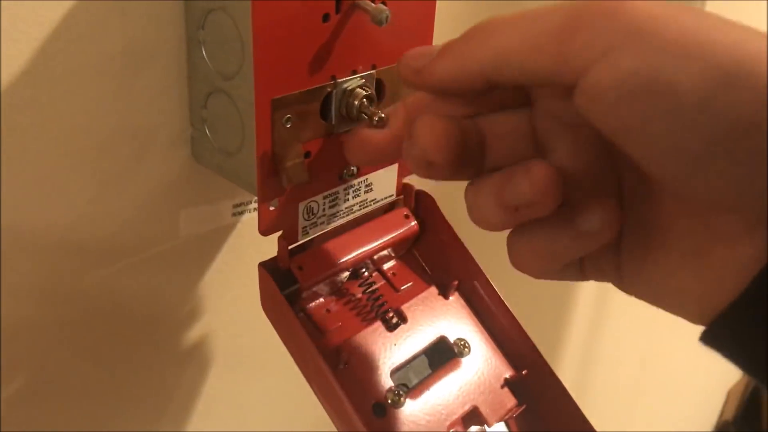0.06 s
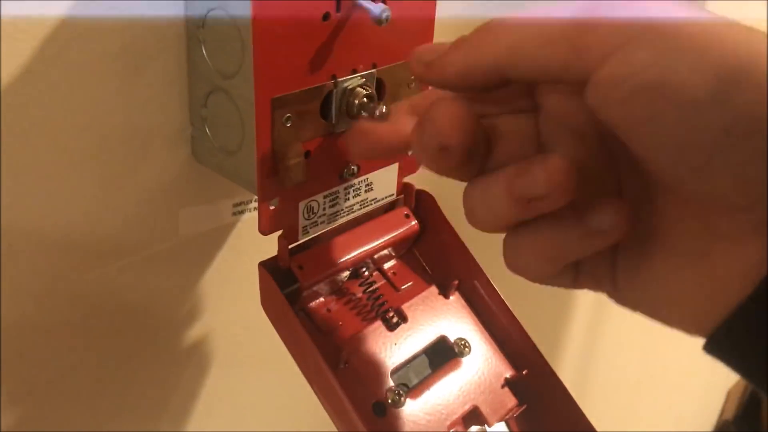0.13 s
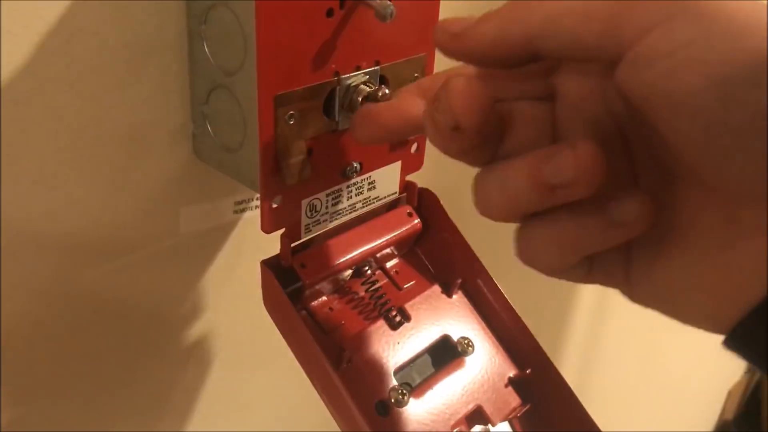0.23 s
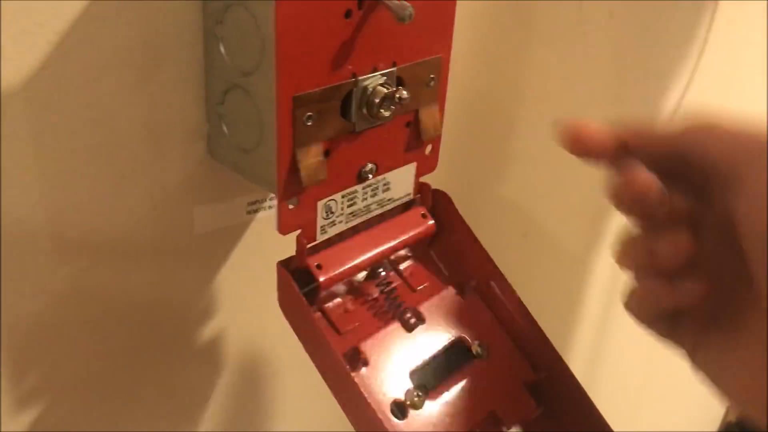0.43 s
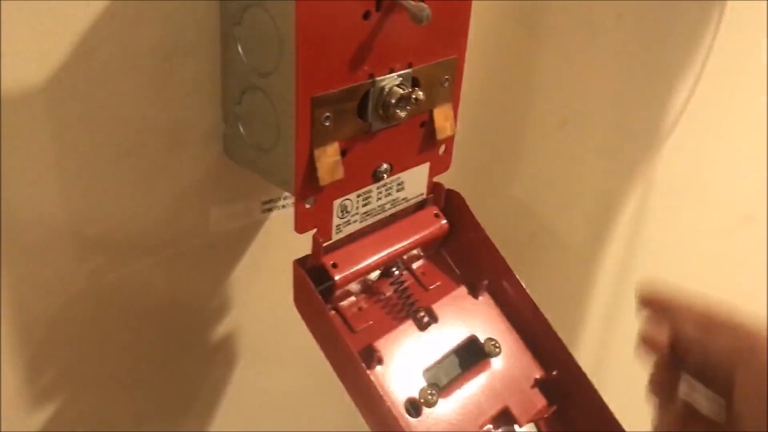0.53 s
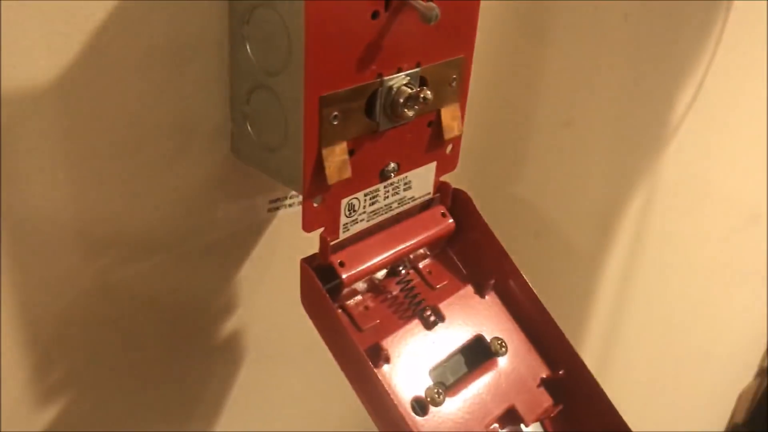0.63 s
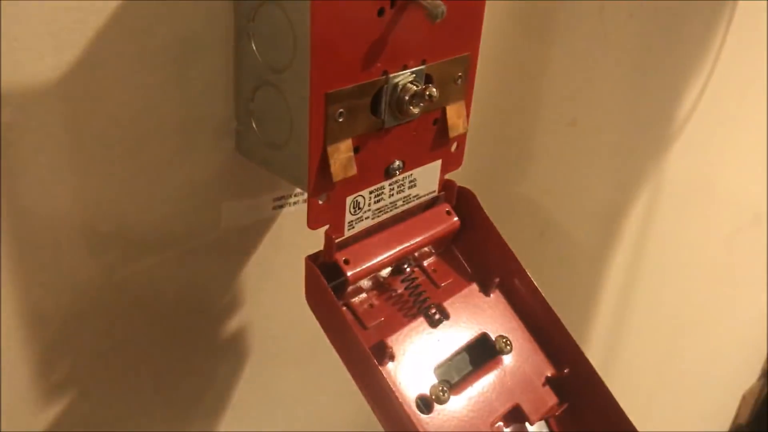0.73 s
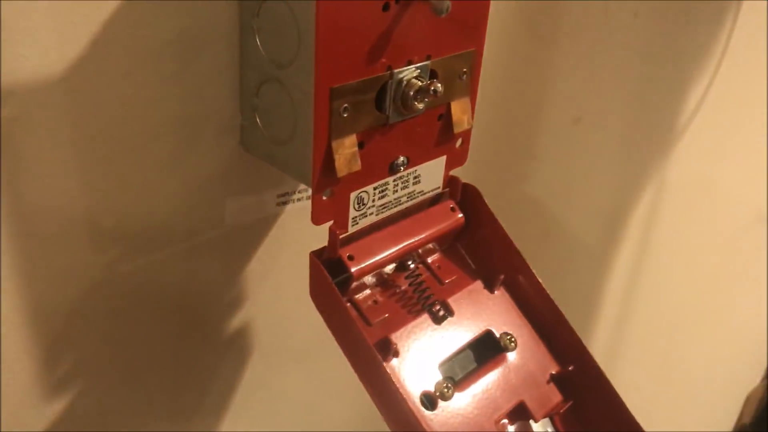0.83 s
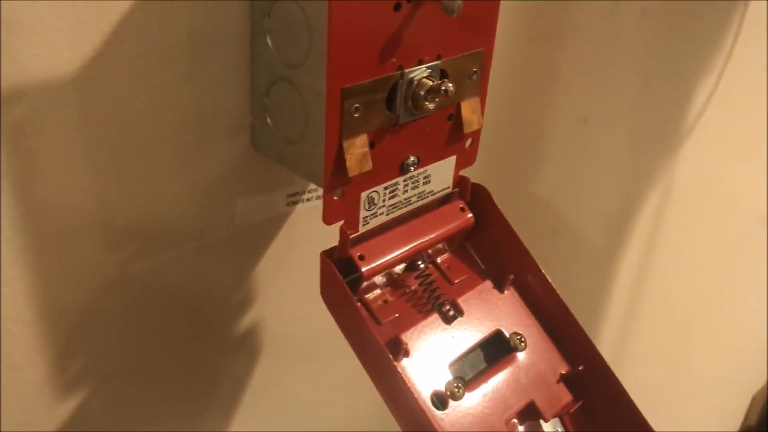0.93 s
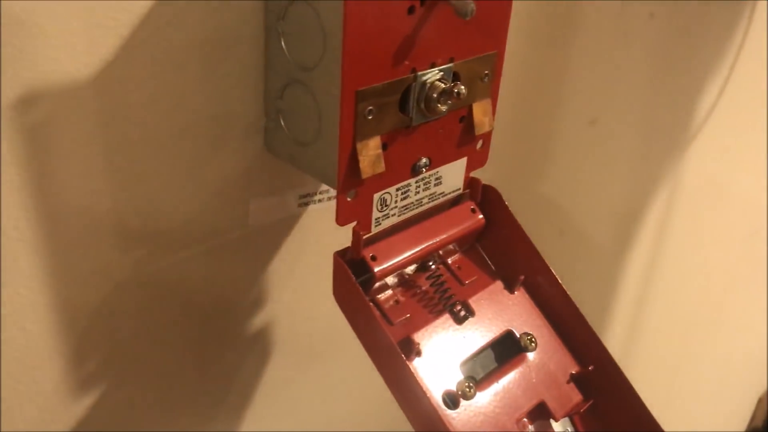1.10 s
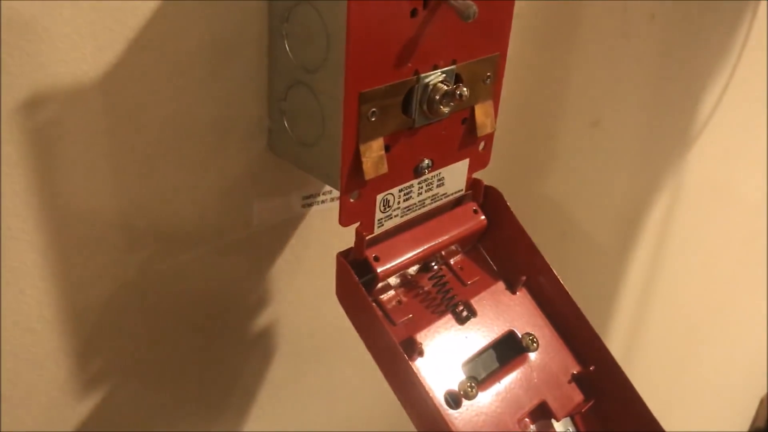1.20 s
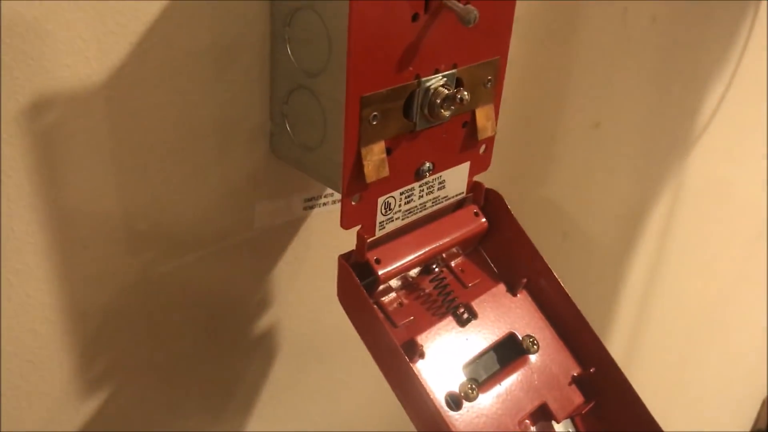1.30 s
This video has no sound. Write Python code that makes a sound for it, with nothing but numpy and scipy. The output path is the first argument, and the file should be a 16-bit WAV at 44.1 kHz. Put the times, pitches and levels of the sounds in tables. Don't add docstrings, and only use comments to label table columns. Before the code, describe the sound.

A small toggle switch snaps over with one sharp metallic click in a wall-mounted metal box.

```python
import sys
import numpy as np
from scipy import signal
from scipy.fft import rfft, irfft, next_fast_len
from scipy.io import wavfile
from scipy.ndimage import map_coordinates

SR = 44100
rng = np.random.default_rng(int(sys.argv[2]) if len(sys.argv) > 2 else 0)


def amplitude_ratio(level_db):
    exponent = np.asarray(level_db, float) / 20
    return 10 ** exponent


def generate_wav(sig):
    pcm = np.round(np.clip(np.atleast_2d(sig).T, -1, 1) * 32767).astype(np.int16)
    wavfile.write(sys.argv[1], SR, pcm)


N = 59535

# t/s, level/dB, brightest f/Hz
CONTACTS = [
    (.2496, -27.5, 6000),
    (.2502, -15.5, 6500),
    (0.2503, -30, 5000),
    (.2524, -22, 11000),
    (0.2526, -26.5, 5000),
    (.2551, -28.5, 4000),
]
SNAP_S = CONTACTS[1][0]
# f/Hz, width/Hz, level/dB
WALL_RUMBLE = [(146, 23, -0.5), (193, 35, -1), (273, 53, -4)]


def unit(x):
    return x / np.sqrt(np.mean(x ** 2) + 1e-20)


def along(points, hz):
    f, v = np.transpose(points)
    return np.interp(np.log(hz + 1), np.log(f + 1), v)


def filtered(x, response):
    m = next_fast_len(len(x) + SR // 2)
    hz = np.fft.rfftfreq(m, 1 / SR)
    return irfft(rfft(x, m) * response(hz), m)[:len(x)]


def resonant(x, peaks):
    def response(f):
        total = 0
        for k, (center, width, db) in enumerate(peaks):
            damping = 1j * f * width
            total = total + (-1) ** k * amplitude_ratio(db) * damping / (center ** 2 - f ** 2 + damping)
        return total
    return filtered(x, response)


def ring(modes, t, rise_s, turn):
    total = np.zeros(len(t))
    for k, (hz, db, t60) in enumerate(modes):
        total += turn ** k * amplitude_ratio(db - 60 * t / t60) * np.sin(2 * np.pi * hz * t)
    return (1 - np.exp(-t / rise_s)) * total


def add(track, s, sound):
    part = track[round(s * SR):][:len(sound)]
    part += sound[:len(part)]


def floor():
    # f/Hz, level/dB per Hz
    hiss_color = [(12, -32), (20, 4), (558, -12.5), (923, -15.5), (1000, -15), (1090, -14.5), (2460, -18.5),
                  (2670, -19), (16000, -18.5)]
    # f/Hz, level/dB rms
    hum_partials = [(118.4, -77), (242.2, -87.5), (301.5, -87), (479.1, -87.5), (538.3, -85.5),
                    (597.5, -90.5), (662.1, -88), (721.4, -90)]
    hiss_db = -68
    t = np.arange(N) / SR

    def sway():
        return map_coordinates(rng.standard_normal(20), [t * 9])

    hum = np.zeros(N)
    for hz, db in hum_partials:
        level = amplitude_ratio(db + 2.5 + 1.9 * sway())
        hum += level * np.sin(2 * np.pi * hz * t + sway())
    hiss = unit(filtered(rng.standard_normal(N), lambda f: amplitude_ratio(along(hiss_color, f))))
    return hum + amplitude_ratio(hiss_db) * hiss


def clock():
    # f/Hz, width/Hz, level/dB
    case = [(1500, 1800, -10.5), (4000, 2000, -10.5), (7260, 500, 5), (9570, 2500, -3), (13500, 5800, -4.5)]
    clock_db, rattle_s, knock_s = -54.5, 0.0036, 0.0105
    kicks, t = np.zeros(N), np.arange(SR // 20) / SR
    shape = amplitude_ratio(-60 * np.clip(t - rattle_s, 0, 1) / 0.008)
    shape = shape + 0.14 * (t > knock_s) * amplitude_ratio(-60 * abs(t - knock_s) / 0.005)
    for s in (0.26, 1.2262):
        add(kicks, s, shape * rng.standard_normal(len(t)))
    return amplitude_ratio(clock_db) * 2 * resonant(kicks, case)


def grip():
    # t/s, level/dB
    pressure = [(0, -82), (0.451, -75), (.5, -68), (0.533, -69), (.546, -81), (0.611, -65), (.66, -78.5),
                (0.758, -82.5), (0.801, -66), (.85, -71.5), (.88, -90), (0.971, -64.5), (1.04, -69.5),
                (1.09, -101), (1.16, -71.5), (1.21, -77.5), (1.312, -77.5), (1.35, -68.5)]
    # f/Hz, width/Hz, level/dB
    shell = [(5333, 260, 0.5), (6690, 350, -3.5), (10800, 2500, -4), (12800, 1500, -2.5)]
    # t/s, peak level/dB
    creak_times = [(0.4938, -45), (0.5043, -40), (0.5145, -42), (0.5214, -42), (0.5327, -38), (0.8254, -53),
                   (0.8627, -57), (0.8884, -58), (0.9334, -64), (0.9637, -59), (0.9862, -58.5),
                   (1.013, -56), (1.0423, -54), (1.064, -41), (1.1445, -43), (1.1583, -43), (1.1785, -39)]
    creak_db, slips_per_s, slip_spread_db, rub_share = 6.5, 1500, 4, 0.29

    chance, size, side = rng.random((3, N))
    slips = (chance < slips_per_s / SR) * amplitude_ratio(-slip_spread_db * np.log(size + 0.1)) * np.sign(side - 0.5)
    friction = rub_share * rng.standard_normal(N) + (1 - rub_share) * unit(slips)
    rub = unit(resonant(friction, shell))

    creaks = np.zeros(N)
    slip_burst = np.array([1, 0.2, 0, 0, 0.1, 0, 0, 0.2, 1.0])
    for s, peak_db in creak_times:
        add(creaks, s, amplitude_ratio(peak_db + creak_db) * slip_burst)

    s, db = np.transpose(pressure)
    return amplitude_ratio(np.interp(np.arange(N) / SR, s, db)) * rub + resonant(creaks, shell)


def wall_rumble():
    return unit(resonant(resonant(rng.standard_normal(N), WALL_RUMBLE), WALL_RUMBLE))


def lean():
    lean_s, span_s, lean_db = 0.135, 0.042, -69
    swell = np.exp(-((np.arange(N) / SR - lean_s) / span_s) ** 2)
    return amplitude_ratio(lean_db) * swell * wall_rumble()


def box_reverb():
    # f/Hz, width/Hz, level/dB
    box_colour = [(2490, 730, 1), (5000, 3900, 0.5), (7100, 1900, -5), (10200, 4000, -3.5)]
    reverb_db, reverb_t60 = -29.5, 0.064
    thud_db, thud_t60, thud_rise_s = -49, 0.35, 0.011
    t = np.clip(np.arange(N) / SR - SNAP_S, 0, 9)
    reverb = amplitude_ratio(reverb_db - 60 * t / reverb_t60) * unit(resonant(rng.standard_normal(N), box_colour))
    thud = amplitude_ratio(thud_db - 60 * t / thud_t60) * wall_rumble()
    return (t > 0) * reverb + (1 - np.exp(-t / thud_rise_s)) * thud


def room(x):
    # f/Hz, t60/s
    decay = [(300, 1), (1000, 0.38), (3000, 0.33), (7000, 0.31), (14000, 0.17)]
    delay_s = 0.005
    hz, t, z = signal.stft(rng.standard_normal(SR // 2), SR, nperseg=256)
    z = z * amplitude_ratio(-60 * t / along(decay, hz)[:, None])
    tail = signal.istft(z, SR, nperseg=256)[1]
    delayed = np.pad(x, (round(delay_s * SR), 0))
    return signal.fftconvolve(delayed, tail / np.linalg.norm(tail))[:N]


def room_answer(switch):
    # f/Hz, level/dB
    air = [(200, -44.5), (400, -9.5), (900, -4), (1500, -0.5), (2700, 1), (6000, -6.5), (11000, 2),
           (16000, -9)]
    air_db, send_db = -27, -24.5
    snap = np.zeros(N)
    add(snap, SNAP_S, np.ones(1))
    burst = amplitude_ratio(air_db) * 10 * filtered(snap, lambda f: amplitude_ratio(along(air, f)))
    return room(burst + amplitude_ratio(send_db) * switch)


def wall_boom():
    # f/Hz, level/dB, t60/s
    wall = [(125, -45.5, 0.47), (143.1, -48, .5), (193.8, -40, 0.26), (216.5, -45, 0.22), (279, -44, .35),
            (310, -49, 0.15), (86, -64, 0.17)]
    swell_s = 0.024
    boom, t = np.zeros(N), np.arange(SR // 2) / SR
    add(boom, SNAP_S, ring(wall, t, swell_s, -0.98))
    return boom


def box_ring():
    # f/Hz, level/dB, t60/s
    box = [(942, 0, .085), (1118, -10, .07), (974, -1.5, .085), (1645, -8, .05), (2058, -4, .05),
           (2355, -4, .05), (2738, -4, .045), (3048, 3, .06), (3596, 1, .055), (4250, -3, .04),
           (4900, -1, .04), (5135, 1, .045), (6274, 0, .04), (6730, -2, .035)]
    # f/Hz, level/dB, t60/s
    plates = [(955, -30, .2), (728, -29, .2), (550, -24, .06), (640, -30, .1), (2420, -28, .2),
              (2525, -29, .2), (2850, -28, .2), (3032, -29, .2), (6562, -33, .2), (8550, -15, .035),
              (10180, -24, .12), (11440, -15, .035), (9985, -16, .035), (5450, -15, .04)]
    box_db = -13
    body, t = np.zeros(N), np.arange(SR // 2) / SR
    metal = amplitude_ratio(box_db) * ring(box, t, 0.00043, -0.97) + ring(plates, t, 0.0023, -0.95)
    add(body, SNAP_S, amplitude_ratio(CONTACTS[1][1]) * metal)
    return body


def contact_cracks():
    # f/Hz, level/dB per Hz
    crack_color = [(200, -41), (600, -23), (1500, -12), (2800, -7.5), (5000, -2), (8000, -5), (11000, -3),
                   (16000, -20)]
    crack_t60, crack_db, peak_db, peak_octaves = 0.0072, 3, 4, 0.81
    cracks, t = np.zeros(N), np.arange(SR // 2) / SR
    for s, db, bright_hz in CONTACTS:
        def response(f):
            octaves = np.log2((f + 1) / bright_hz)
            return amplitude_ratio(along(crack_color, f) + peak_db * np.exp(-(octaves / peak_octaves) ** 2))
        crack = unit(filtered(rng.standard_normal(len(t)), response))
        add(cracks, s, amplitude_ratio(db + crack_db - 60 * t / crack_t60) * crack)
    return cracks


def scene():
    switch = contact_cracks() + box_ring()
    blow = switch + wall_boom() + room_answer(switch)
    background = clock() + grip() + floor()
    strain = lean() + box_reverb()
    return (blow + background + strain)[None]


def top_cut(x):
    return signal.sosfilt(signal.butter(12, 16530, fs=SR, output="sos"), x)


def record(dry):
    top_hz = 15900
    mix = filtered(dry[0], lambda hz: 1 / (1 + (hz / top_hz) ** 80))
    return top_cut(mix)


dry = scene()
out = record(dry)
generate_wav(out)
```